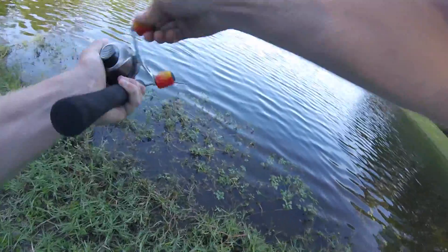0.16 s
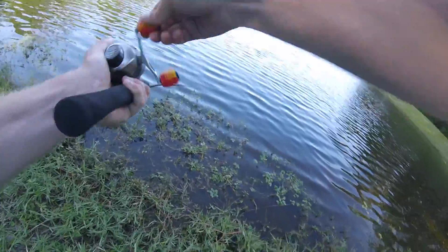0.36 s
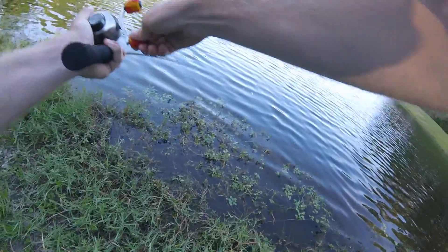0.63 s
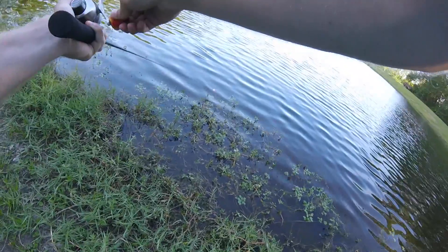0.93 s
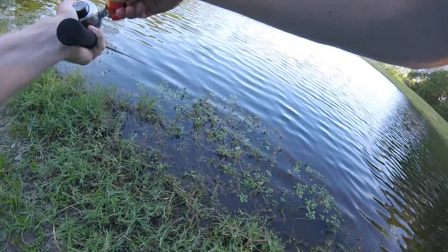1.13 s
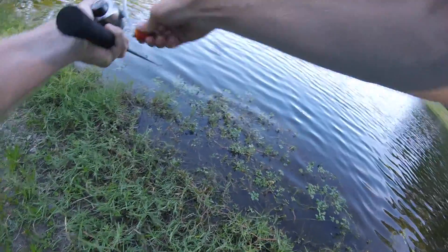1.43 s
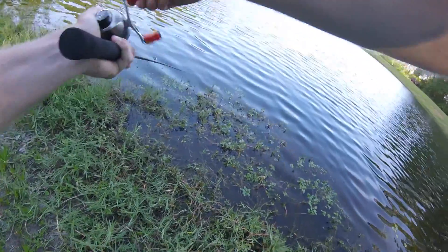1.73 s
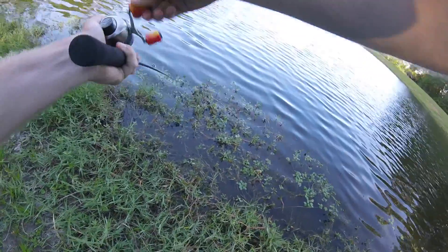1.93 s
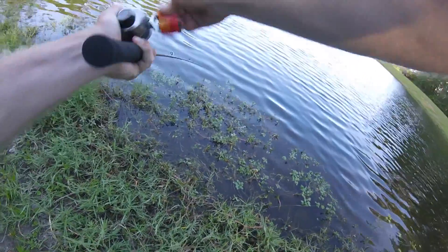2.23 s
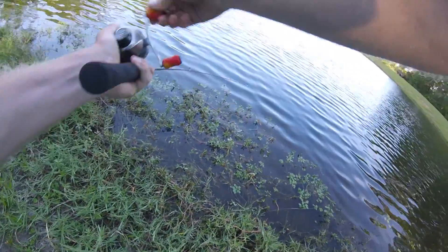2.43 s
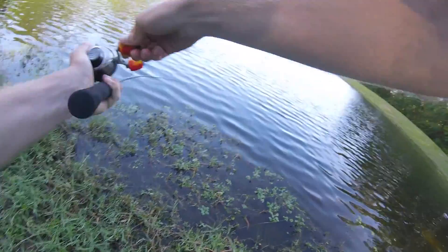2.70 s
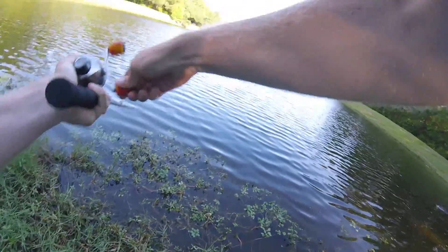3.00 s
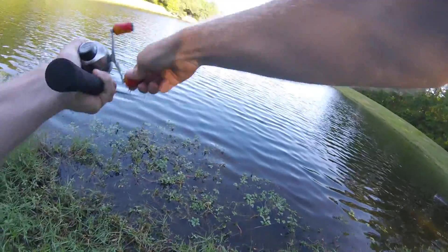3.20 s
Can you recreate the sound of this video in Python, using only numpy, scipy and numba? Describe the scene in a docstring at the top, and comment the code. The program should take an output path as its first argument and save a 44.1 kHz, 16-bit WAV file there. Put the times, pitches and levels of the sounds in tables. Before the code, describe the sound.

Close, metallic fishing reel whirring starts at once, pauses, returns briefly, then runs longer with stray clicks; dull knocks bump the microphone housing, while soft outdoor hiss, rumble and faint chirps sit behind, slightly muffled and mono.

```python
"""Beside a pond, a spincast reel is cranked in uneven pushes close to a body-worn camera.
The anti-reverse pawl scrapes over ratchet teeth: short ticks sing and ring the shell; gears whirr with speed.
Arm movements knock the camera housing, heard as decaying modes amid rubbing noise; the hand rubs the grip.
Behind lie wind and handling rumble, hiss and slow swings of shaped noise,
faint gliding sine chirps and thin insect notes of narrow noise."""
import sys
import numpy as np
from scipy import signal
from scipy.fft import rfft, irfft
from scipy.io import wavfile
from scipy.ndimage import uniform_filter1d
from numba import njit

SR = 44100
rng = np.random.default_rng(int(sys.argv[2]) if len(sys.argv) > 2 else 0)


def to_wav(sig):
    """Store sig (one row per channel, or 1-D mono) as 16-bit WAV at the path in sys.argv[1].

    Samples outside -1..1 are clipped; the rate is SR.
    """
    pcm = np.clip(np.atleast_2d(sig), -1, 1) * 32767
    pcm = np.round(pcm).astype(np.int16)
    wavfile.write(sys.argv[1], SR, pcm.T)  # frames by channels


N = 147735
T = np.arange(N) / SR

# Spells of cranking; each a list of: time_s, rate_teeth_per_s, relative_tick_level_db
CRANKING = [
    [(0, 200, -3.5), (.06, 130, -4.5), (.11, 213, -4), (.175, 164, -17), (.2, 158, -1.5), (.255, 154, -4),
     (.32, 316, -2.5), (.365, 194, -6.5), (.4, 215, 0.5), (.425, 192, -3), (.465, 264, -4), (.5, 384, -6),
     (.56, 310, -9), (.61, 213, -9), (.672, 83, -9)],
    [(1.073, 77, -6), (1.115, 120, -10), (1.155, 116, -10.5), (1.195, 221, -10), (1.255, 119, -5),
     (1.295, 53, -10)],
    [(1.678, 59.25, -11.5), (1.73, 179, -11.5), (1.79, 137, -4), (1.82, 70, -11), (1.9, 206, -8),
     (1.925, 110, -7), (1.985, 170, -5.5), (2.07, 78, -10), (2.15, 164, -7), (2.21, 227, -8.5),
     (2.25, 127, -5.5), (2.29, 127, -9), (2.335, 225, -4), (2.38, 120, -10.5), (2.44, 245, -8.5),
     (2.48, 170, -10), (2.5, 85.6, -7), (2.55, 208, -6.5), (2.605, 123, -9), (2.66, 140, -6.5),
     (2.715, 86, -9.5), (2.745, 70, -8)],
]
# Single teeth between and after the spells: time_s, relative_tick_level_db
SINGLE_TEETH = [(1.027, -22.5), (1.056, -10), (1.333, -15), (1.422, -13), (1.496, -13.5), (1.528, -7),
                (1.547, -8), (1.56, -10), (1.570, -7), (1.584, -8), (1.622, -19), (1.660, -7.5),
                (2.754, -13.5), (2.780, -10.5), (2.800, -11.5), (2.816, -11.5), (2.832, -16), (2.839, -14)]
# Main ring of the pawl, before chatter: time_s, centre_hz
PAWL_RING = [(0, 6604), (.5, 6080), (.62, 6870), (1.2, 6767), (1.9, 6845), (2.8, 6554)]
# Resonances of the reel shell: centre_hz, width_hz, relative_level_db
SHELL_MODES = [(1616, 109, -1.5), (1864, 1070, -4.5), (3170, 353, -0.5), (4955, 850, -2.5), (6070, 185, 8),
               (6950, 100, 5.5), (8560, 370, -8), (9260, 440, -14), (10530, 280, -10.5)]
# Background spectrum, rescaled later in two bands: frequency_hz, relative_density_db
AIR_SPECTRUM = [(20, 4), (40, -2.5), (96, -6.5), (150, -5.5), (245, -10), (350, -13), (450, -17.5),
                (800, -24.5), (1350, -47), (1600, -45.5), (2000, -50.5), (3200, -57.5), (4600, -61),
                (6000, -58), (6900, -51), (7500, -61), (12200, -71), (16000, -85)]
# Low rumble, before gain and flutter: time_s, level_db
RUMBLE_LEVEL = [(0.0, -37), (0.23, -35.5), (0.61, -38.5), (0.74, -37.5), (1.01, -39), (1.37, -36),
                (1.79, -37), (1.92, -36), (2.99, -38), (3.35, -36)]
# Background treble, before flutter: time_s, level_db
HISS_LEVEL = [(0, -45.5), (.7, -57), (1.0, -58), (1.3, -56.5), (1.45, -50.5), (1.65, -49.5), (2.6, -49.5),
              (2.8, -55.5), (3.0, -52), (3.15, -52), (3.24, -53.5), (3.35, -47.5)]
# Knocks on the camera housing; columns after level_db are relative to it, pitch aside:
# time_s, level_db, boom_db, thud_db, upper_modes_db, clack_pitch_hz, rubbing_db
KNOCKS = [(.173, -10.5, -11, -30, 1, 362, -16.5), (.368, -17, -4, -2.5, -2, 400, -6),
          (.434, -22, 2, 0, -12, 404, -6), (.588, -11.5, -6.5, -18, -1.5, 346, -12),
          (.712, -28.5, 0, 5, -12, 332, -3.5), (.724, -25, -33, -13, -7, 813, -18),
          (1.262, -32.5, -19, -18, -15, 450, -2.5), (1.765, -9.5, -4, -3.5, -1, 338, -15.5),
          (1.975, -26.5, -8, 5.5, -2, 500, -3.5), (2.186, -22, -5, -10, -17, 334, -15),
          (2.209, -28.5, 4, 3, -13, 318, -8), (2.416, -16.5, -2, -2, 1, 383, -16),
          (2.638, -9.5, -1.5, 0, -6.5, 359.2, -10.5), (2.883, -20.5, -7, -2.5, -26, 352, -11.5),
          (3.023, -26.5, 3.5, -8, -11, 318, -10), (3.233, -22.5, -3, -13, -16, 363, -15)]
# Upper modes of the housing: frequency_hz, relative_level_db, t60_s
HOUSING_MODES = [(578, -9.5, 0.027), (750, -5.5, 0.018)]
# Gliding chirps: start_s, length_s, from_hz, to_hz, level_db, roughness_0_to_1
CHIRPS = [(0.835, .035, 3800, 2900, -51.5, 0.18), (.865, 0.039, 2500, 1510, -77, .2),
          (1.284, 0.04, 3720, 3380, -54, 0.3), (1.329, 0.021, 2530, 2900, -55, .1),
          (1.36, 0.04, 3470, 2800, -48.5, .08), (1.438, 0.042, 2960, 2550, -54, 0.14)]
# Hand rubs on the grip: centre_s, half_length_s, centre_hz, level_db
GRIP_RUBS = [(1.419, 0.022, 1630, -45.5), (1.516, 0.024, 1700, -52), (1.622, 0.015, 1630, -46),
             (2.958, 0.034, 1710, -54), (3.225, 0.017, 1820, -45)]
# Insect notes: centre_s, half_length_s, pitch_hz, level_db
INSECT_NOTES = [(1.47, 0.05, 3990, -60.5), (2.5, 0.017, 4000, -51), (2.95, 0.026, 6950, -58),
                (3.08, 0.032, 6900, -58), (3.08, 0.033, 4060, -59), (3.16, 0.026, 3970, -59),
                (3.335, .02, 4040, -62)]

TICK_HALF_S, TICK_TAIL_DB, TICK_TAIL_S = 0.00064, -6, 0.0021
TICK_SCATTER_DB, TOOTH_JITTER_S = 2.5, 0.00023
RING_GAIN_DB, SHELL_GAIN_DB, SHELL_LOW_CUT_HZ = -21.5, -22.5, 1583
CHATTER_DEPTH_HZ, CHATTER_RATE_HZ, CHATTER_WIDTH_HZ = 378, 484, 1300
# gear noise level at the reference rate, before the shell; growth with speed
WHIRR_DB, WHIRR_REF_TEETH_PER_S, WHIRR_POWER = -13, 212, 1.68
MESH_DB = -2.5  # even pulses of the meshing gears, against their noise

RUMBLE_GAIN_DB, RUMBLE_FLUTTER_DB, HISS_FLUTTER_DB, AIR_SPLIT_HZ = 3, 1, 1.0, 1640
SWAY_HZ, SWAY_GAIN_DB, SWAY_REST = 6.8, -31, 0.14  # pressure swings from the moving arms

BOOM_HZ, BOOM_T60_S = 153.2, 0.13
THUD_HZ, THUD_T60_S = 196.6, 0.036
CLACK_T60_S, CONTACT_S = 0.037, 0.00023
CLACK_LEAD_S, LOW_LAG_S = 0.001833, 0.0016  # clack first, hollow modes last
RUB_DECAY_S, HOUSING_TOP_HZ = 0.0072, 958

GRIP_WIDTH_HZ, INSECT_WIDTH_HZ = 350, 40
TOP_HZ = 11800


def undb(db):
    """Decibels to amplitude."""
    return 10 ** (np.asarray(db) / 20)


def unit(x):
    """Scale to an rms of 1."""
    return x / np.sqrt(np.mean(x ** 2))


def curve(rows, axis=1):
    """One table column, joined by straight lines in time."""
    rows = np.array(rows)
    return np.interp(T, rows[:, 0], rows[:, axis])


@njit
def svf(x, hz, width_hz):
    """State-variable band-pass with a centre per sample, gain 1 there."""
    y, band_state, low_state = np.empty(len(x)), 0., 0.
    for i in range(len(x)):
        g = np.tan(np.pi * hz[i] / SR)
        k = width_hz / hz[i]
        v = (band_state + g * (x[i] + 1e-18 - low_state)) / (1 + g * (g + k))
        band_state = 2 * v - band_state
        low_state = low_state + 2 * g * v
        y[i] = k * v
    return y


def band(x, hz, width_hz):
    """One fixed resonance."""
    return svf(x, hz * np.ones(N), float(width_hz))


def cut(x, hz, kind, order=4):
    """Butterworth low-pass or high-pass."""
    return signal.sosfilt(signal.butter(order, hz, kind, fs=SR, output="sos"), x)


def noise():
    """White noise."""
    return rng.standard_normal(N)


def walk(hz):
    """Random drift below hz, rms 1."""
    return unit(cut(noise(), hz, "low", order=2))


def ring(at_s, hz, t60_s):
    """A struck mode: decaying sine with a short contact rise."""
    age_s = np.maximum(T - at_s, 0)
    decay = np.exp(-np.log(1000) * age_s / t60_s)
    rise = 1 - np.exp(-age_s / CONTACT_S)
    return np.sin(2 * np.pi * hz * age_s) * decay * rise


def swells(rows, width_hz):
    """Narrow noise bands under Gaussian envelopes."""
    out = np.zeros(N)
    for centre_s, half_length_s, hz, db in rows:
        envelope = np.exp(-((T - centre_s) / half_length_s) ** 2)
        tone = band(band(noise(), hz, width_hz), hz, 2 * width_hz)
        out += undb(db) * envelope * unit(tone)
    return out


def during(spell):
    """True while a spell of cranking lasts."""
    return (T >= spell[0][0]) & (T <= spell[-1][0])


def crank():
    """Teeth per second and tick strength through all spells."""
    rate, size = np.zeros(N), np.zeros(N)
    for spell in CRANKING:
        rate += during(spell) * curve(spell)
        size += during(spell) * undb(curve(spell, axis=2))
    return rate, size


def pass_teeth(rate, size):
    """Integrated rate gives tooth impulses, jittered and scattered, and even gear-mesh pulses."""
    teeth, mesh = np.zeros(N), np.zeros(N)
    for spell in CRANKING:
        passed = np.ceil(np.cumsum(rate * during(spell)) / SR)
        at = np.flatnonzero(np.diff(passed, prepend=0))
        mesh[at] = np.sqrt(SR / np.maximum(rate[at], 1))  # steady power at any rate
        chance = rng.standard_normal((N // 100, 2))[:len(at)]
        shift = (chance[:, 0] * TOOTH_JITTER_S * SR).astype(int)
        hit = np.clip(at + shift, 0, N - 1)
        teeth[hit] = size[at] * undb(TICK_SCATTER_DB * chance[:, 1])
    for time_s, db in SINGLE_TEETH:
        teeth[int(time_s * SR)] = undb(db)
    return teeth, mesh


def reel(rate, size):
    """The pawl scrapes each tooth and sings; scrapes and meshing gears ring the shell."""
    teeth, mesh = pass_teeth(rate, size)
    lag_s = np.arange(-512, 513) / SR
    tick = np.exp(-(lag_s / TICK_HALF_S) ** 2)
    tail = (lag_s > 0) * undb(TICK_TAIL_DB) * np.exp(-np.abs(lag_s) / TICK_TAIL_S)
    contact = signal.fftconvolve(teeth, tick, "same")
    ringing = signal.fftconvolve(teeth, np.maximum(tick, tail), "same")

    whirr = undb(WHIRR_DB) * (rate / WHIRR_REF_TEETH_PER_S) ** WHIRR_POWER
    scrape = contact * np.sign(noise())
    friction = scrape + whirr * (noise() + undb(MESH_DB) * mesh)
    shell = sum(undb(db) * band(friction, hz, width_hz) for hz, width_hz, db in SHELL_MODES)

    # fast flutter of the pawl's pitch
    flutter = band(noise(), CHATTER_RATE_HZ, CHATTER_WIDTH_HZ)
    flutter = unit(band(flutter, CHATTER_RATE_HZ, CHATTER_WIDTH_HZ))
    pawl_hz = curve(PAWL_RING) + CHATTER_DEPTH_HZ * flutter
    sing = ringing * np.sin(2 * np.pi * np.cumsum(pawl_hz) / SR)
    shell = cut(shell, SHELL_LOW_CUT_HZ, "high", order=8)
    return undb(RING_GAIN_DB) * sing + undb(SHELL_GAIN_DB) * shell


def air(rate):
    """Fluttering wind and handling rumble, outdoor hiss, and slow swings that grow with cranking."""
    hz, db = np.array(AIR_SPECTRUM).T
    bins_hz = np.maximum(np.arange(N // 2 + 1) * SR / N, 1)
    shape = undb(np.interp(np.log(bins_hz), np.log(hz), db))
    wash = irfft(rfft(noise()) * shape, N)

    rumble_db = curve(RUMBLE_LEVEL) + RUMBLE_GAIN_DB + RUMBLE_FLUTTER_DB * walk(6)
    rumble = unit(cut(wash, AIR_SPLIT_HZ, "low")) * undb(rumble_db)
    hiss_db = curve(HISS_LEVEL) + HISS_FLUTTER_DB * walk(19)
    hiss = unit(cut(wash, AIR_SPLIT_HZ, "high")) * undb(hiss_db)

    effort = SWAY_REST + uniform_filter1d(rate, size=6000) / WHIRR_REF_TEETH_PER_S
    swing = unit(cut(band(noise(), SWAY_HZ, 5), 23, "low"))
    return rumble + hiss + undb(SWAY_GAIN_DB) * effort * swing


def knocks():
    """Housing modes: clack, upper modes, then thud and hollow boom; rubbing swells around each knock."""
    out, rubbing = np.zeros(N), np.zeros(N)
    for time_s, db, boom_db, thud_db, upper_db, clack_hz, rub_db in KNOCKS:
        clack = ring(time_s - CLACK_LEAD_S, clack_hz, CLACK_T60_S)
        upper = sum(undb(upper_db + mode_db) * ring(time_s, hz, t60_s)
                    for hz, mode_db, t60_s in HOUSING_MODES)
        boom = undb(boom_db) * ring(time_s + LOW_LAG_S, BOOM_HZ, BOOM_T60_S)
        thud = undb(thud_db) * ring(time_s + LOW_LAG_S, THUD_HZ, THUD_T60_S)
        out += undb(db) * (clack + upper + boom + thud)
        rubbing += undb(db + rub_db) * np.exp(-np.abs(T - time_s) / RUB_DECAY_S)
    rub = rubbing * unit(band(noise(), 370, 340))
    return cut(out + rub, HOUSING_TOP_HZ, "low", order=6)


def chirps():
    """Faint sine glides, mostly falling, roughened by random pitch drift."""
    out = np.zeros(N)
    for start_s, length_s, from_hz, to_hz, db, rough in CHIRPS:
        part = np.clip((T - start_s) / length_s, 0, 1)
        glide_hz = from_hz + (to_hz - from_hz) * part
        hz = glide_hz * (1 + 0.43 * rough * walk(450))
        out += undb(db) * np.sin(np.pi * part) * np.sin(2 * np.pi * np.cumsum(hz) / SR)
    return out


def grip():
    """Skin rubs softly on the rod grip: short bands of noise."""
    return swells(GRIP_RUBS, GRIP_WIDTH_HZ)


def insect():
    """Thin notes: very narrow bands of noise."""
    return swells(INSECT_NOTES, INSECT_WIDTH_HZ)


def scene():
    """Sum of all sources, one channel."""
    rate, size = crank()
    return (reel(rate, size) + air(rate) + knocks() + chirps() + grip() + insect())[None]


def record(dry):
    """Steep elliptic low-pass at TOP_HZ."""
    return signal.sosfilt(signal.ellip(8, .2, 70, TOP_HZ, fs=SR, output="sos"), dry)


dry = scene()
out = record(dry)
to_wav(out)
```